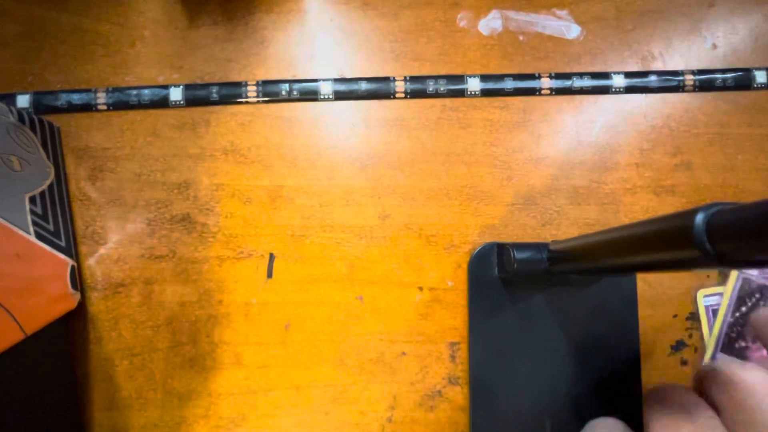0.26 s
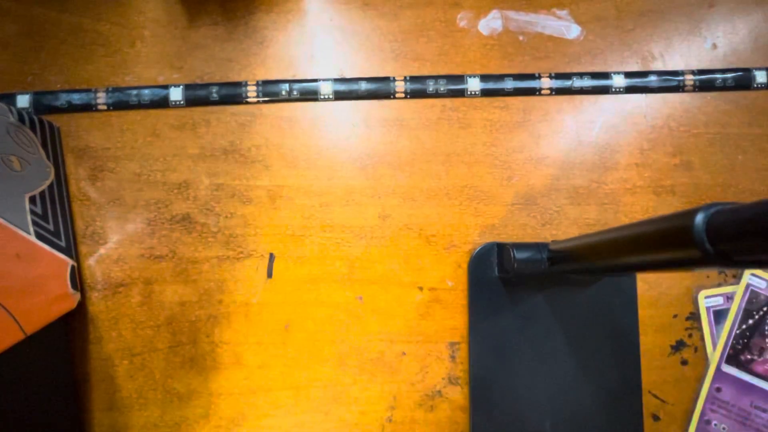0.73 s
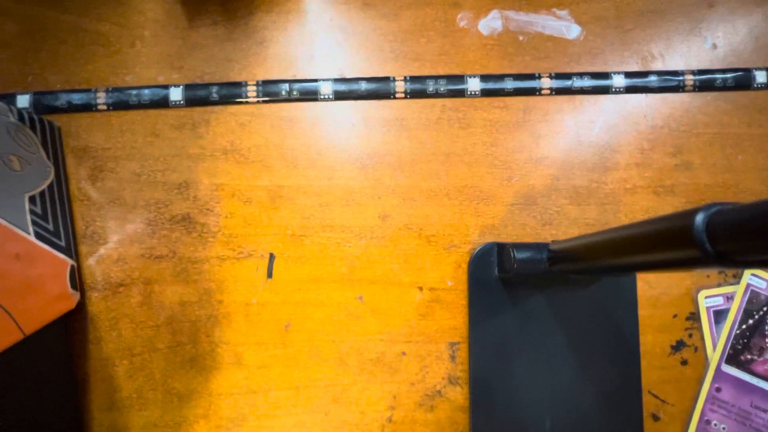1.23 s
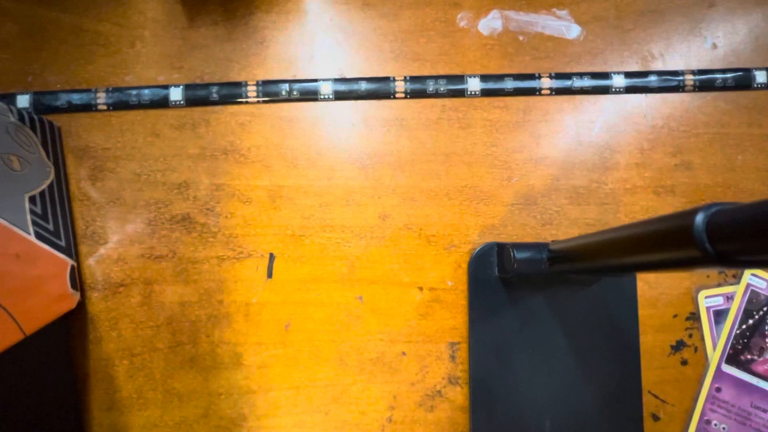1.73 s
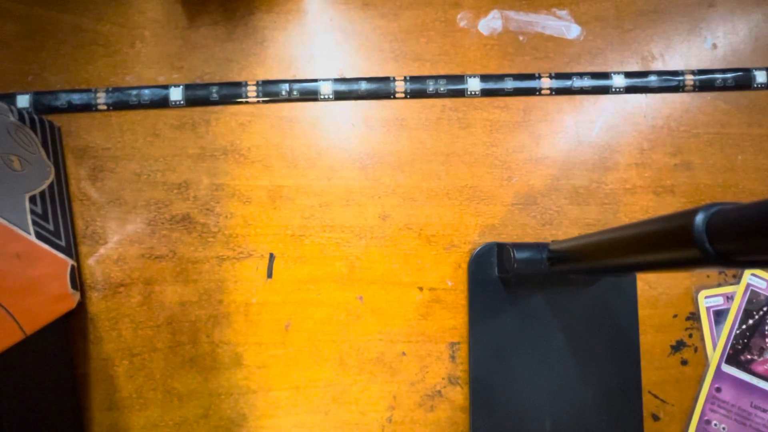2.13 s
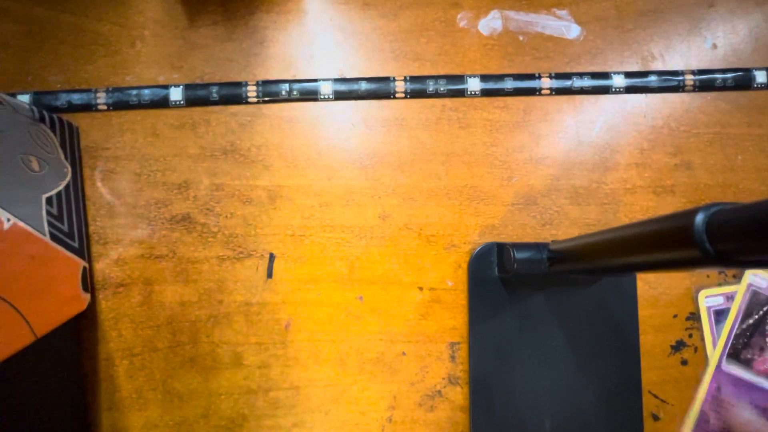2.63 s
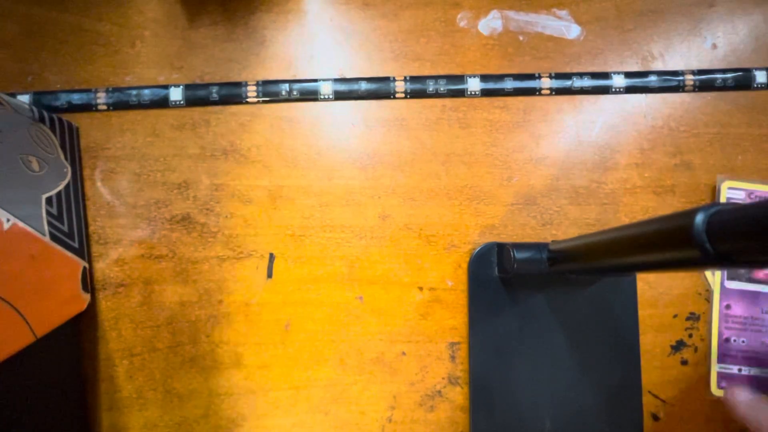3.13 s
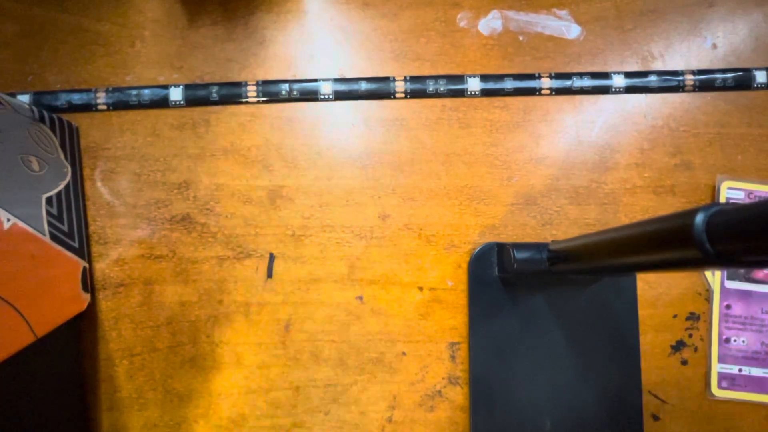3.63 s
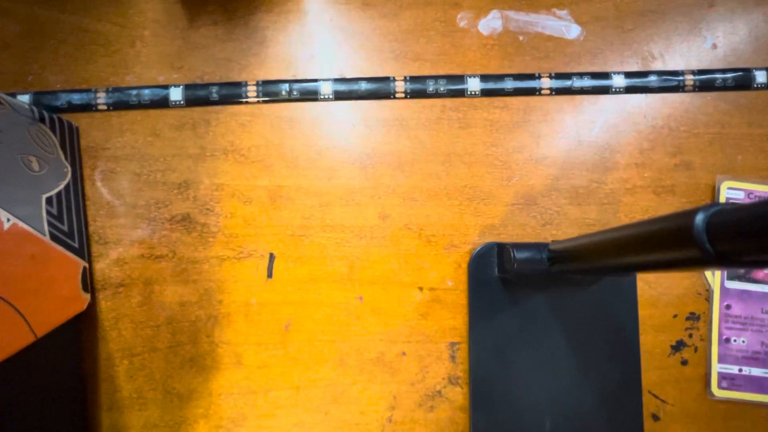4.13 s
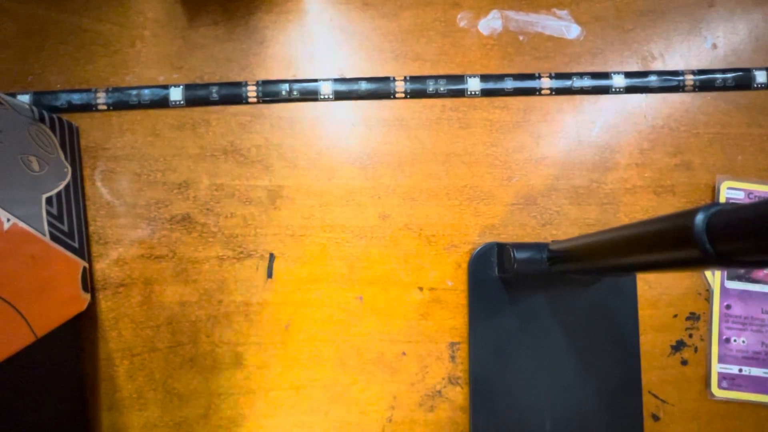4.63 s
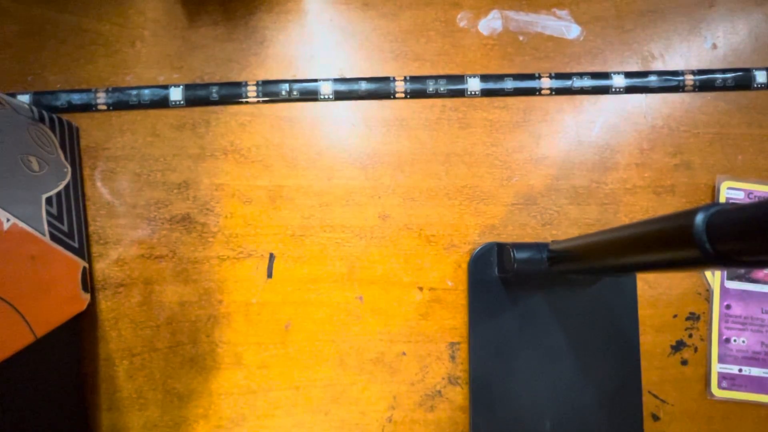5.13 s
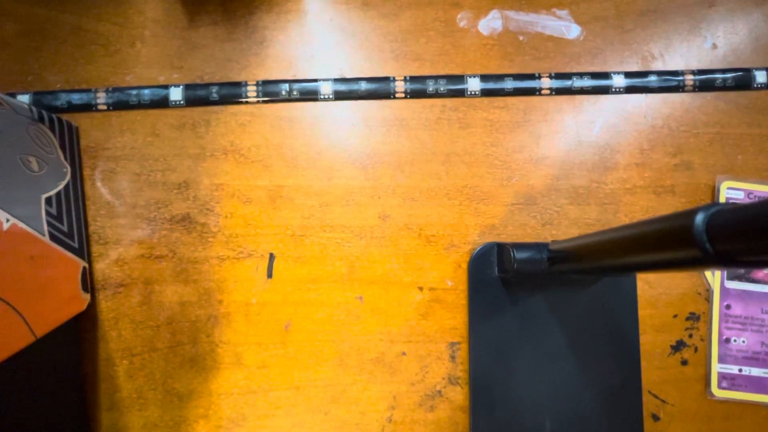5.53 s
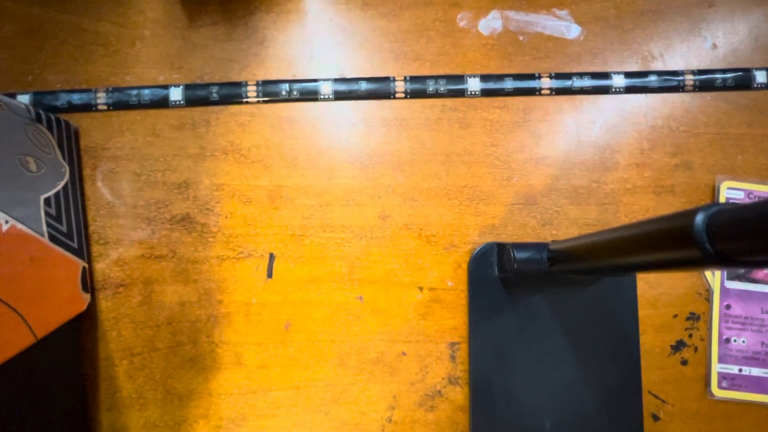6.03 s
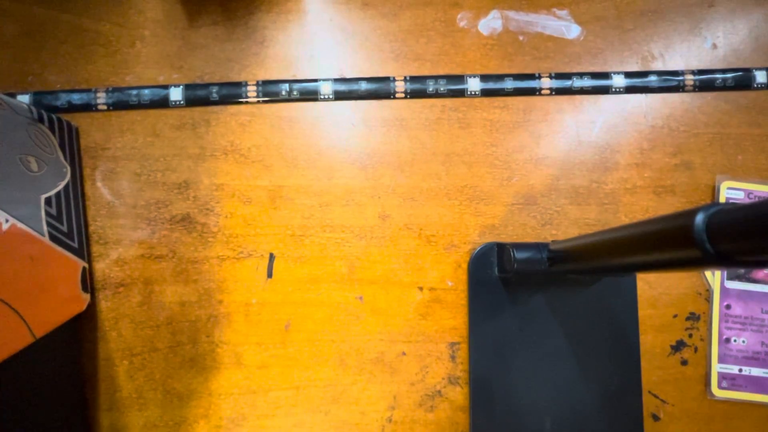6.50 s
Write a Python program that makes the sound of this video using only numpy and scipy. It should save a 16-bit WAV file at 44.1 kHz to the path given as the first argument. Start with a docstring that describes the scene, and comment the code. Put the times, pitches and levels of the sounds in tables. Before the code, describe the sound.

Quiet close handling of cards and a thin plastic sleeve on wood, with short scrapes, small clicks and a few hard clacks in a small room.

```python
"""Cards handled on a wooden desk, close to two microphones in a small room with faint 120 Hz hum.
First taps and short strokes, and a brief rub that rings a thin sleeve; then one long, sinking pull.
Later strokes alternate with ticks and bumps; something stiff clatters at 3.6, 6.0 and 6.6 s.
Blows are damped modes plus coloured noise bursts; rubbing is random slips through filters and resonances."""
import sys
import numpy as np
from scipy import signal
from scipy.fft import rfft, irfft, next_fast_len
from scipy.io import wavfile
from scipy.ndimage import uniform_filter1d

SR = 44100
rng = np.random.default_rng(int(sys.argv[2]) if len(sys.argv) > 2 else 0)


def output_pcm(signal):
    """Save a mono or channel-first signal as 16-bit PCM at the path in sys.argv[1].

    Samples are clipped to [-1, 1] before scaling.
    """
    pcm = np.clip(np.atleast_2d(signal).T, -1, 1) * 32767
    wavfile.write(sys.argv[1], SR, np.round(pcm).astype(np.int16))


N = 298116
TIME = np.arange(N) / SR

# Still air in the room. Each row: frequency in Hz, relative density in dB.
AIR_SPECTRUM = [(20, -20), (35, -6.5), (60, 6.5), (130, -6.5), (300, -16.5), (600, -20), (1200, -24.5),
                (3000, -29), (8000, -34), (12800, -38), (14300, -51.5)]
# Room decay. Each row: frequency in Hz, T60 in seconds.
ROOM_DECAY = [(100, 0.17), (400, 0.15), (1000, 0.093), (3000, 0.1), (8000, 0.088), (15000, 0.018)]
# Twist by desk and mount between microphones. Each row: frequency in Hz, extra lag in radians.
MIC_TWIST = [(60, -1), (200, 0.31), (450, 1.03), (750, 0.86), (1300, 0.5), (1800, -0.53), (3000, 0.43),
             (4000, -1.76), (5200, -2.5), (8000, -6.5)]
# Balance of the microphones. Each row: frequency in Hz, left minus right in dB.
MIC_BALANCE = [(60, 11), (300, 5.5), (700, 8.5), (1300, 3.5), (2400, 8), (5000, 12), (8000, 6),
               (11000, -1.5)]
# Likeness of the microphones. Each row: frequency in Hz, left-right likeness from 0 to 1.
MIC_LIKENESS = [(60, 1), (700, 0.98), (1500, 0.92), (2350, 0.88), (3300, 0.6), (7000, .6), (11000, 0.2)]
# Tap position, from the pile on the right towards the hands. Each row: time in seconds, right lag in ms.
TAP_PLACE = [(.25, -0.43), (.93, 0.33), (1.53, 0.39), (3.46, 0.35), (3.57, 0.35), (4.28, 0.21),
             (5.98, 0.39), (6.7, 0.37)]
# Echoes off things on the desk. Each row: delay in ms, signed share of the direct sound.
NEAR_ECHOES = [(1.05, 0.029), (2.601, -0.029), (4.3, -0.039), (6.9, 0.1)]
# Hand rumble. Each row: frequency in Hz, relative density in dB.
RUMBLE_SPECTRUM = [(20, -33.5), (32, -21), (48, -3), (70, -2.5), (120, -0.5), (200, -9), (310, -2),
                   (420, -8), (700, -19.5), (1500, -57)]
# Heel of the hand pressing and rolling. Each row: time of the peak in seconds, length in seconds, level in dB.
PRESSES = [(0.282, 0.15, -48), (0.993, 0.11, -47), (1.113, 0.24, -50.5), (1.581, 0.08, -55),
           (3.136, 0.28, -49), (3.314, 0.11, -44.5), (4.844, 0.3, -59), (5.253, 0.082, -52),
           (5.518, 0.39, -58), (5.718, 0.53, -53.5), (6.037, 0.052, -45.5), (6.342, 0.25, -50.5)]
# Soft bumps of a hand or flat card. Each row: start in seconds, level in dB, pitch in Hz.
BUMPS = [(0.113, -42.5, 120), (0.254, -33.5, 120.3), (0.945, -34, 65), (5.46, -44, 88), (6.042, -39, 94.4),
         (1.225, -49.5, 125), (3.194, -45.5, 109), (3.534, -36.5, 92), (3.748, -39.5, 72), (3.787, -49, 63),
         (3.909, -40.5, 73), (4.065, -34.5, 120), (4.768, -50, 125.7), (4.9, -52.5, 120.4),
         (5.098, -54.5, 119.6)]
# A fingertip sticks and jumps. Each row: start in seconds, level in dB.
JUDDERS = [(4.767, -46), (5.05, -52.5), (5.086, -47), (5.263, -49), (5.686, -39), (5.692, -41),
           (5.702, -41), (5.721, -37), (5.742, -42), (5.775, -43), (5.794, -53), (6.335, -42), (6.351, -52),
           (6.361, -51), (6.377, -49)]
# Desk modes rung by each jump. Each row: frequency in Hz, relative level in dB, T60 in seconds.
JUDDER_MODES = [(120.7, -9.5, 0.033), (309, 3, 0.022), (455, 0, 0.016), (653, -2, 0.023)]
# Film hiss. Each row: frequency in Hz, relative density in dB.
FILM_SPECTRUM = [(400, -4), (1200, -5.5), (2500, -7.5), (4500, 1.5), (7500, -1), (9300, -3.5), (11500, -1),
                 (13000, -9.5), (14000, -24.5), (15500, -32.5)]
# Scuffs of a stiff card's edge. Each row: start in seconds, length in seconds, starting level in dB,
# fade in dB per second, grip as a factor on mode frequency and width.
SCUFFS = [(0.117, 0.057, -72, 17.5, 1.8), (0.197, 0.035, -61.5, -90, 1.24), (0.405, 0.078, -69.5, 5, 0.76),
          (1.075, 0.078, -55.5, 20, 0.41), (1.53, 0.069, -58, 217, 0.32), (2.464, 0.36, -57.5, -28, 0.92),
          (2.735, 0.097, -54.5, 12, 1.05), (3.094, 0.088, -34.5, 175, 1.013),
          (3.306, 0.034, -43, -3.5, 0.98), (3.6, 0.072, -41.5, 127.5, 1.08),
          (3.697, 0.042, -48.5, 34, 1.137), (5.423, 0.096, -50, 7, 0.94), (5.626, 0.057, -46.5, 84, 0.92),
          (5.966, 0.022, -46.5, -1, 1), (5.995, 0.049, -45.5, 60, 0.96), (6.04, 0.14, -55.5, 108.5, 0.98),
          (6.395, 0.078, -71.5, 15, 0.95), (6.619, 0.042, -33.5, 110, 0.98)]
# Rubs on the thin sleeve. Each row: start in seconds, length in seconds, starting level in dB,
# fade in dB per second, grip as a factor on mode frequency and width.
SLEEVE_RUBS = [(1.054, 0.14, -60, 87, 0.95)]
# Bending modes of a held card. Each row: nominal frequency in Hz, nominal width in Hz, gain in dB.
CARD_MODES = [(730, 150, -1), (1420, 150, 0.5), (2320, 300, 0), (3320, 200, -6), (4450, 250, -17)]
# Modes of the sleeve. Each row: nominal frequency in Hz, nominal width in Hz, gain in dB.
SLEEVE_MODES = [(2560, 450, 0), (3720, 200, -7), (5120, 320, -2), (7350, 500, -12)]
# Resonances of the pulled card. Each row: multiple of its pitch, gain in dB.
PULL_MODES = [(.24, 3), (.57, -2.5), (1, 0.5), (1.45, -15), (2.02, -12)]
# Wood-grain rasp. Each row: frequency in Hz, relative density in dB.
RASP_SPECTRUM = [(120, -14.5), (290, -2.5), (450, 0), (660, 5), (880, 4), (1130, -2.5), (1400, -4.5),
                 (1800, -10.5), (2300, -13.5), (4200, -18), (7000, -28.5), (10000, -44), (15000, -72.5)]
# Strokes over wood and film. Each row: start in seconds, length in seconds, rise in seconds,
# fade over the stroke in dB, drag level in dB, edge sharpness as treble over drag in dB, film hiss in dB.
STROKES = [(0.1, 0.12, 0.0085, 13, -98, 3, -61), (0.188, 0.081, 0.066, 20, -64, 24.5, -50),
           (0.26, 0.073, .01, 4, -90, -14, -66), (0.369, 0.12, 0.031, -9, -105, 7, -77.5),
           (0.897, 0.035, 0.011, 0.5, -48.5, 15.5, -53.5), (1.046, 0.23, 0.011, 22, -51, 5, -64),
           (1.162, 0.17, 0.21, -5.5, -59, 7.5, -66), (1.447, 0.15, 0.032, -3, -68, -17, -99),
           (1.521, 0.44, 0.27, 3.5, -50, 4.5, -72), (2.115, 0.048, 0.041, -3.5, -64, 1, -78),
           (2.286, 0.21, 0.069, -2.5, -51.5, 8, -71.5), (2.451, 0.37, 0.0061, 0, -44, 3, -60.5),
           (2.839, 0.13, 0.011, -4.5, -58.5, 7, -71.5), (3.091, 0.086, 0.0059, 7, -39.5, 3.5, -75),
           (3.293, 0.027, 0.0062, -9, -47, 2.5, -70), (3.386, 0.14, 0.057, -4, -48.5, 11, -56.5),
           (3.579, 0.17, 0.0065, 18.5, -31.5, 0.5, -45), (3.845, 0.1, 0.065, 3.5, -42, 10.5, -51),
           (3.939, 0.12, 0.095, -4.5, -51, 11, -57.5), (4.063, 0.096, 0.0089, -1, -70, -6, -62.5),
           (4.19, 0.029, 0.017, -3, -93.5, -22, -59.5), (4.272, 0.1, 0.0061, 1.5, -62, 6.5, -58),
           (4.491, 0.16, 0.09, 6, -80, 4, -63.5), (4.749, .13, 0.014, -1, -66.5, 9.5, -71.5),
           (5.02, 0.097, 0.021, -4, -60, 1, -81.5), (5.202, .12, 0.013, 1, -62.5, 7, -78),
           (5.323, 0.29, 0.13, 13.5, -47, 7, -63), (5.62, 0.068, 0.014, 5, -43, 6.5, -63),
           (5.693, 0.057, 0.0071, 8, -51, 2, -67), (5.96, 0.1, 0.0055, 3, -43, 2.5, -65),
           (6.271, 0.098, 0.011, 3, -60.5, -0.5, -72.5), (6.387, 0.066, 0.025, 4, -47, -11, -89),
           (6.564, 0.087, 0.054, 2, -36.5, 4.5, -57.5)]
# Contact chatter of clacks. Each row: frequency in Hz, relative density in dB.
CLACK_SPECTRUM = [(300, -29.5), (900, 0), (1130, -3), (1400, 1), (1800, -3), (2300, 1), (2750, -7),
                  (3300, -3), (4200, -13.5), (6500, -13.5), (9000, -28.5), (15000, -48.5)]
# Contact chatter of ticks. Each row: frequency in Hz, relative density in dB.
TICK_SPECTRUM = [(400, -21.5), (1500, 7.5), (3500, -5), (5200, 1.5), (7500, 0.5), (9300, -6), (11500, -4.5),
                 (13500, -15.5), (16000, -15)]
# Corners catching and letting go. Each row: start in seconds, reference level in dB, pitch in Hz.
CARD_CLICKS = [(0.744, -47, 1010), (1.022, -47, 1850), (1.025, -54, 3030), (1.173, -53, 1200),
               (1.733, -48, 1500), (1.772, -33.5, 1930), (1.838, -42, 1290), (2.034, -48, 1870),
               (2.179, -54.5, 1600), (2.455, -44, 2380), (2.93, -49, 3220), (2.947, -39, 2000),
               (2.964, -37, 1800), (3.055, -47.5, 1440), (3.394, -44, 2300), (3.402, -36, 1270),
               (3.902, -27.5, 890), (3.929, -37, 2170), (3.984, -33.5, 940), (5.027, -62, 2240),
               (5.228, -57, 2120), (5.383, -45, 1150), (5.545, -40, 2190), (5.55, -35, 1130),
               (5.591, -56, 1900), (5.632, -40, 1880), (5.87, -48.5, 1477), (6.292, -37.5, 1730),
               (6.663, -26.5, 1410)]
# Damped corner modes. Each row: multiple of the pitch, relative level in dB.
CORNER_MODES = [(.52, -4), (1, 0), (1.45, -3), (2.1, -11)]
# Springy edges flicking free. Each row: start in seconds, tick reference in dB, ring level in dB, pitch in Hz.
EDGE_TICKS = [(0.109, -49, -49, 2040), (0.2471, -39, -43, 11350), (.254, -39.5, -45, 3630),
              (0.464, -65, -55, 7900), (0.476, -56.5, -55, 5080), (0.478, -69, -54, 1410),
              (0.808, -63, -67, 4900), (0.867, -66.5, -59, 11330), (1.052, -46.5, -42, 3630),
              (1.108, -65, -55, 5230), (2.41, -55, -53, 4170), (3.253, -42, -45, 3280),
              (3.337, -64, -50, 4400), (3.4, -45, -58, 4600), (3.498, -42.5, -40.5, 4600),
              (3.568, -32, -30.5, 3410), (3.571, -32.5, -36, 4630), (3.591, -32.5, -41.5, 5020),
              (3.604, -39, -43, 5630), (4.208, -63, -60, 4360), (4.284, -38.5, -49, 3500),
              (4.368, -51.5, -59, 4770), (4.581, -58, -67.5, 7600), (4.764, -67.5, -69.5, 4980)]
# Taps on the desk. Each row: start in seconds, thud in dB, knock in dB, clack in dB,
# pitch of the struck spot in Hz, ring of the card's edge in dB, pitch of the edge in Hz.
TAPS = [(.109, -47, -44, -52.5, 710, -41.5, 1510), (.254, -34, -42, -52, 390, -41.5, 1144),
        (.929, -41, -44, -41, 620, -38, 2050), (.941, -38, -36.5, -50, 530, -47, 5100),
        (0.946, -34.5, -30, -71, 398, -40, 910), (1.053, -64, -44, -84, 370, -43, 1060),
        (1.526, -56, -50, -60, 685, -61, 1250), (1.531, -44, -33.5, -64, 735, -51, 1150),
        (1.538, -40.5, -39, -66, 518, -44, 870), (2.394, -38, -38, -63, 473, -58, 990),
        (2.912, -81, -35, -51, 708, -55, 1340), (2.921, -69, -40, -53, 870, -40, 1970),
        (3.095, -32, -26, -39.5, 454, -35, 2200), (3.254, -48, -44, -39, 489, -43, 2210),
        (3.285, -46, -36, -64, 392, -60, 1362), (3.307, -55.5, -40, -50, 640, -48, 2250),
        (3.322, -61, -31, -50, 740, -31, 1310), (3.334, -46.5, -30, -39, 728, -38.5, 3400),
        (3.34, -64, -43, -38.5, 630, -41, 2300), (3.429, -39, -28, -69, 616, -58, 1360),
        (3.457, -32.5, -24.5, -42, 710, -30, 1300), (3.475, -34, -22, -41, 696, -34.5, 2330),
        (3.484, -55, -37, -67, 610, -52, 1340), (3.499, -31.5, -22.5, -25, 767, -36, 3250),
        (3.5665, -31.5, -15, -26.5, 680, -31, 3345), (3.57, -25.5, -7.5, -15.5, 714, -17.5, 1400),
        (3.59, -39, -30, -27, 840, -19.5, 2050), (3.594, -54, -14.5, -23, 876, -16.5, 1380),
        (3.604, -54, -28, -26, 904, -18, 1364), (4.282, -47.5, -39.5, -48, 700, -49, 1124),
        (5.983, -38, -16.5, -21, 735, -16, 2403), (5.9845, -33.5, -11.5, -21, 630, -15, 1360),
        (6.128, -60, -32, -48.5, 784, -42.5, 1380), (6.138, -42, -32.5, -55.5, 500, -44.5, 1153),
        (6.259, -59, -42.5, -52.5, 810, -51, 2200), (6.326, -38, -41, -76, 503, -65.5, 2300),
        (6.41, -41.5, -46, -57, 714, -54.5, 2340), (6.432, -51.5, -45, -57, 522, -54, 2410),
        (6.441, -54, -55, -64, 636, -51.5, 2320), (6.463, -48, -54, -63, 620, -61, 2480),
        (6.589, -33, -25.5, -34.5, 882, -38, 2380), (6.595, -34, -26, -54, 800, -34, 1480),
        (6.603, -32.5, -27, -40, 623, -33.5, 2320), (6.619, -25.5, -20, -30, 820, -32, 2410),
        (6.626, -22.5, -27, -33, 340, -44, 2420), (6.632, -33, -38, -41, 495, -32, 2360),
        (6.638, -54, -14, -38, 623, -27, 1420), (6.641, -43, -40, -42, 620, -48, 3120),
        (6.652, -65, -30, -31, 567, -36, 2271), (6.747, -45, -32, -55, 646, -58, 1280)]
# Slow bending of the desk top. Each row: frequency in Hz, nominal relative level in dB, T60 in seconds.
DESK_BENDING = [(71.6, -14, 0.076), (119, -4, 0.083), (177, -3.5, 0.08), (272, -5.5, .07),
                (307.9, -2, 0.079), (430, 10.5, 0.016)]
# Quick wood modes. Each row: frequency in Hz, nominal level against the struck spot in dB, T60 in seconds.
DESK_RING = [(452.5, -27.5, 0.1), (608, -20.5, 0.07), (697, -19, 0.03), (840, -25, 0.037),
             (930, -30, 0.096), (1021, -8, 0.015), (1397, -12, 0.021), (1360.5, -31, 0.051)]

BAND_EDGE_HZ = 15800
# A stroke's level rises by a power law, stops quickly and trails off as the fingers relax.
RISE_POWER, STOP_DB_PER_S, TRAIL_DB, TRAIL_DB_PER_S = 2.1, 417.5, -12.5, 92
# The hand leans harder in a louder stroke: rumble is HAND_DB (plus rest) at a drag of PUSH_DB.
PUSH_DB, HAND_DB, HAND_SLOPE_DB_PER_DB, HAND_REST_DB = -52.5, -56.5, 0.65, -74.5
CRINKLES_PER_S, CRINKLE_DB = 10, -8.5  # level against drag treble and film hiss
PULL_START_S, PULL_S, PULL_DB, PULL_SWELL_DB_PER_S = 2.47, .38, -50, 20
PULL_HZ, PULL_SAG_HZ_PER_S, PULL_WIDTH_HZ, PULL_WOBBLE_RATIO = 3480, 3100, 340, .02
CATCHES_PER_S, CATCH_DB, CATCH_SIZE_DB = 420, -44, 3.8
CATCH_T60_CYCLES, CATCH_TILT_DB_PER_OCTAVE = 30, -6
CORNER_T60_S, CORNER_TICK_DB = .007, -24
FILM_T60_S, FILM_CLACK_DB = 0.027, -17
TAP_TICK_DB = -22  # relative to the clack
SPOT_T60_S, SPOT_RISE_S, EDGE_T60_S, EDGE_RISE_S = .019, 0.0046, 0.013, 0.002


def gain_of(db):
    """Decibels to amplitude."""
    return 10 ** (np.asarray(db) / 20)


def evened(x):
    """Scales to rms 1."""
    return x / np.sqrt(np.mean(x ** 2) + 1e-20)


def peaked(x, size=88):
    """Scales so that the loudest two milliseconds of the envelope have rms 1."""
    power = abs(signal.hilbert(x)) ** 2 / 2
    return x / np.sqrt(uniform_filter1d(power, size, mode="constant").max())


def read(points, hz):
    """Reads a table on a log-frequency axis."""
    f, value = np.transpose(points)
    return np.interp(np.log(hz + 1), np.log(f + 1), value)


def add(mix, s, sound):
    """Mixes a stereo sound in at time s."""
    part = mix[:, max(round(s * SR), 0):][:, :sound.shape[1]]
    part += sound[:, :part.shape[1]]


def colour(x, spectrum, size=4096):
    """Causal minimum-phase filter with the given spectrum."""
    log_gain = np.log(gain_of(read(spectrum, abs(np.fft.fftfreq(size, 1 / SR)))))
    response = np.fft.ifft(np.exp(np.conj(signal.hilbert(log_gain)))).real
    return signal.fftconvolve(x, response[:size // 2])[:len(x)]


def wander(cutoff_hz):
    """Smooth random curve of rms 1."""
    hz = np.fft.rfftfreq(N, 1 / SR)
    return evened(irfft(rfft(rng.standard_normal(N)) / (1 + (hz / cutoff_hz) ** 4), N))


def microphones(x, lag_ms=0.412, size=96):
    """Stereo pair: right is delayed, rebalanced by frequency and partly scattered over two milliseconds."""
    length = next_fast_len(len(x) + 16 * size, True)
    hz = np.fft.rfftfreq(length, 1 / SR)
    same = np.clip(read(MIC_LIKENESS, hz), 0, 1)
    scatter = rfft(irfft(np.exp(2j * np.pi * rng.random(size // 2 + 1))), length)
    lag = np.exp(-1j * (2 * np.pi * hz * lag_ms / 1000 + read(MIC_TWIST, hz)))
    right_gain = gain_of(-read(MIC_BALANCE, hz))
    right = right_gain * lag * (same + np.sqrt(1 - same ** 2) * scatter)
    pair = np.array([np.ones(len(hz)), right])
    power_norm = np.sqrt(2 / (1 + right_gain ** 2))
    return irfft(rfft(x, length) * pair * power_norm, length)[:, :len(x)]


def dying(t, hz, t60_s, rise_s):
    """One mode that swells, then dies away."""
    return np.sin(2 * np.pi * hz * t) * gain_of(-60 * t / t60_s) * (1 - np.exp(-t / rise_s))


def ring(modes, t, detune, spread_db, favour_db=0):
    """Dying modes, randomly detuned and weighted at each strike."""
    hz, db, t60_s = np.transpose(modes)
    shift, weight = rng.standard_normal((2, len(modes)))
    height = rng.choice([-1, 1], len(modes)) * gain_of(db + favour_db + spread_db * weight)
    decay = gain_of(-60 * t[:, None] / t60_s)
    return (decay * np.sin(2 * np.pi * hz * (1 + detune * shift) * t[:, None])) @ height


def snap(spectrum, t, t60_s, rise_s):
    """Contact chatter: a brief noise burst coloured by the struck thing."""
    contact = rng.standard_normal(len(t)) * gain_of(-60 * t / t60_s) * (1 - np.exp(-t / rise_s))
    return peaked(colour(contact, spectrum))


def friction(slips_per_s, size_db, smooth, judder_db, judder_hz):
    """Random slips of uneven size plus noise, clumped by the unsteady push of the fingers."""
    sizes = gain_of(size_db * np.minimum(rng.exponential(1, N), 4)) * rng.choice([-1, 1], N)
    slips = evened(sizes * (rng.random(N) < slips_per_s / SR))
    return evened((slips + smooth * rng.standard_normal(N)) * gain_of(judder_db * wander(judder_hz)))


def resonate(x, hz, width_hz):
    """A steep resonance that follows the curve hz."""
    turn = np.exp(2j * np.pi * np.cumsum(hz) / SR)
    r = np.exp(-np.pi * width_hz / SR)
    return 2 * (turn * signal.lfilter([(1 - r) ** 2], [1, -2 * r, r * r], x / turn)).real


def background():
    """Still room air as partly shared noise, and a faint mains hum with wandering phase."""
    left, right, shared = (evened(colour(rng.standard_normal(N), AIR_SPECTRUM)) for _ in range(3))
    air = np.array([left, right]) + 2.14 * shared
    hum = np.sqrt(2) * np.sin(2 * np.pi * 120 * TIME + 0.24 * wander(2))
    return gain_of(-77.0) * air + gain_of(-75.5) * microphones(hum)


def room(x, size=256, count=20000):
    """Dense reflections from nearby walls, each band dying at its own speed; fed by the left channel."""
    echoes = rng.standard_normal((2, count)) * (rng.random((2, count)) < .1)
    hz, t, z = signal.stft(echoes, SR, nperseg=size)
    decay = gain_of(-60 * t / read(ROOM_DECAY, hz)[:, None])
    tail = signal.istft(z * decay, SR, nperseg=size)[1][:, :count]
    tail = tail * np.clip((TIME[:count] - .003) / 0.0046, 0, 1)
    tail = tail / np.linalg.norm(tail, axis=1)[:, None]
    return signal.fftconvolve(x[:1], tail, axes=1)[:, :N] * gain_of([[0], [-3]])


def hollow(x):
    """Echoes from close by comb the rubbing into hollow bands."""
    length = next_fast_len(N + SR, True)
    hz = np.fft.rfftfreq(length, 1 / SR)
    comb = 1 + sum(share * np.exp(-2j * np.pi * hz * ms / 1000) for ms, share in NEAR_ECHOES)
    return irfft(rfft(x, length) * comb, length)[:, :N]


def hands(push):
    """Soft skin rumbles on the desk top, with every stroke and when the hand presses down."""
    level = gain_of(HAND_DB) * (push / gain_of(PUSH_DB)) ** HAND_SLOPE_DB_PER_DB + gain_of(HAND_REST_DB)
    for s, length_s, db in PRESSES:
        press = np.cos(np.pi * np.clip((TIME - s) / length_s, -.5, .5)) ** 2
        level = np.hypot(level, gain_of(db) * press)
    slips = friction(slips_per_s=220, size_db=2.5, smooth=0.89, judder_db=2.0, judder_hz=60)
    return microphones(level * evened(colour(slips, RUMBLE_SPECTRUM)))


def bumps(size=8192):
    """A soft push sets the desk top swinging in one damped mode."""
    out, t = np.zeros((2, N)), np.arange(size) / SR
    for s, db, hz in BUMPS:
        swing = dying(t, hz, t60_s=0.17, rise_s=0.0006)
        add(out, s, microphones(gain_of(db) * peaked(swing)))
    return out


def judders(size=4096):
    """As a stroke slows, each jump of the fingertip gives the desk a dull little knock."""
    out, t = np.zeros((2, N)), np.arange(size) / SR
    for s, db in JUDDERS:
        jump = ring(JUDDER_MODES, t, detune=0.065, spread_db=0.5) * (1 - np.exp(-t / 0.0033))
        add(out, s, microphones(gain_of(db) * peaked(jump)))
    return out


def crinkles(treble, film):
    """The moving card snags at random, at levels that follow the rubbing."""
    snags = rng.choice([-1, 1], N) * (rng.random(N) < CRINKLES_PER_S / SR)
    dull, bright = peaked(colour(snags, CLACK_SPECTRUM)), peaked(colour(snags, TICK_SPECTRUM))
    return microphones(gain_of(CRINKLE_DB) * (treble * dull + film * bright))


def glide(film):
    """Thin film hisses finely as the card moves along it."""
    slips = friction(slips_per_s=2100, size_db=1.0, smooth=0.44, judder_db=2.0, judder_hz=70)
    return microphones(film * evened(colour(slips, FILM_SPECTRUM)), lag_ms=0.4)


def scuffs(rows, modes):
    """Slips of an edge drive the sheet's own modes, which shift as the fingers bend it."""
    out, bend = np.zeros((2, N)), 1 + 0.024 * wander(14)
    slips = friction(slips_per_s=900, size_db=3, smooth=.65, judder_db=1.5, judder_hz=80)
    for s, length_s, db, fade_db_per_s, grip in rows:
        during = (TIME >= s) & (TIME < s + length_s)
        sheet = evened(sum(
            gain_of(mode_db) * resonate(slips[during], hz * grip * bend[during], 0.99 * width_hz * grip)
            for hz, width_hz, mode_db in modes))
        level = gain_of(db - fade_db_per_s * (TIME[during] - s))
        add(out, s, microphones(sheet * level * signal.windows.tukey(len(sheet), .15), lag_ms=0.4))
    return out


def catches(count=24, size=1024):
    """Tiny catches of the pulled edge on the grain, ringing briefly at one of several pitches."""
    length, t = round(PULL_S * SR), np.arange(size) / SR
    grit, out = np.zeros(length), np.zeros((2, N))
    for hz in np.geomspace(550, 6000, count):
        sizes = gain_of(CATCH_SIZE_DB * np.minimum(rng.exponential(1, length), 3))
        kicks = sizes * (rng.random(length) < CATCHES_PER_S / count / SR)
        grain = evened(dying(t, hz, CATCH_T60_CYCLES / hz, 1 / hz))
        grain = grain * gain_of(CATCH_TILT_DB_PER_OCTAVE * np.log2(hz / 1000))
        grit += signal.fftconvolve(kicks, grain)[:length]
    add(out, PULL_START_S, microphones(gain_of(CATCH_DB) * evened(grit)))
    return out


def long_pull():
    """Slips drive the card's resonances, which sink together as its free length grows."""
    t = np.arange(0, PULL_S, 1 / SR)
    slips = friction(slips_per_s=600, size_db=3.5, smooth=.3, judder_db=2.2, judder_hz=70)[:len(t)]
    hz = (PULL_HZ - PULL_SAG_HZ_PER_S * t) * (1 + PULL_WOBBLE_RATIO * wander(7.4)[:len(t)])
    song = evened(sum(gain_of(db) * resonate(slips, ratio * hz, PULL_WIDTH_HZ) for ratio, db in PULL_MODES))
    level = gain_of(PULL_DB + PULL_SWELL_DB_PER_S * t) * signal.windows.tukey(len(t), .2)
    out = np.zeros((2, N))
    add(out, PULL_START_S, microphones(song * level, lag_ms=0.36))
    return out


def stroke_levels():
    """Amplitudes of drag, its treble and film hiss: each stroke rises, fades by its own slope and stops."""
    power = np.zeros((3, N))
    for s, length_s, rise_s, fade_db, drag_db, sharp_db, film_db in STROKES:
        t = TIME[TIME >= s][:SR] - s
        after = np.maximum(t - length_s, 0)
        progress = np.clip((t - rise_s) / max(length_s - rise_s, .001), 0, 1)
        held = np.clip(t / rise_s, 0, 1) ** RISE_POWER * gain_of(-fade_db * progress)
        release = np.maximum(gain_of(-STOP_DB_PER_S * after), gain_of(TRAIL_DB - TRAIL_DB_PER_S * after))
        levels = gain_of([[drag_db], [drag_db + sharp_db], [film_db]])
        add(power, s, (levels * held * release) ** 2)
    return np.sqrt(power)


def drag(body, treble):
    """Slips over the wood grain sound through the desk; a sharper edge brings more treble."""
    slips = friction(slips_per_s=1400, size_db=3.0, smooth=.6, judder_db=1.2, judder_hz=60)
    rasp = evened(colour(slips, RASP_SPECTRUM))
    dull = signal.sosfiltfilt(signal.butter(2, 1600, fs=SR, output="sos"), rasp)
    return microphones(body * dull + treble * (rasp - dull))


def flick(clack_db, tick_db, ring_db, rung, t):
    """An edge catches, springs free and rings for a moment."""
    clack = gain_of(clack_db - 16.5) * snap(CLACK_SPECTRUM, t, t60_s=0.0095, rise_s=0.00013)
    tick = gain_of(tick_db - 0.5) * snap(TICK_SPECTRUM, t, t60_s=0.022, rise_s=0.00015)
    return microphones(clack + tick + gain_of(ring_db) * peaked(rung), lag_ms=0.34)


def flicks(size=2048):
    """Card corners click dully in several damped modes; springy edges tick brightly and ring on."""
    out, t = np.zeros((2, N)), np.arange(size) / SR
    for s, db, hz in CARD_CLICKS:
        corner = sum(
            rng.choice([-1, 1]) * gain_of(mode_db) * dying(t, ratio * hz, CORNER_T60_S, rise_s=0.00029)
            for ratio, mode_db in CORNER_MODES)
        add(out, s, flick(db, db + CORNER_TICK_DB, db - 4.0, corner, t))
    for s, tick_db, ring_db, hz in EDGE_TICKS:
        edge = dying(t, hz, FILM_T60_S, rise_s=0.00016)
        add(out, s, flick(tick_db + FILM_CLACK_DB, tick_db, ring_db, edge, t))
    return out


def taps(size=8192):
    """Each tap bends the desk, rings the wood around the spot and snaps the card's edge at its own pitch."""
    out, t = np.zeros((2, N)), np.arange(size) / SR
    for s, thud_db, knock_db, clack_db, spot_hz, edge_db, edge_hz in TAPS:
        thud = peaked(ring(DESK_BENDING, t, detune=0.022, spread_db=2.5) * (1 - np.exp(-t / 0.005)))
        # modes below the spot's pitch are barely driven, and a soft blow misses the high ones
        octaves = np.log2(np.transpose(DESK_RING)[0] / spot_hz)
        hardness_db = min(clack_db - knock_db + 14.0, 3)
        favour_db = 14 * np.minimum(octaves, 0) + 0.21 * np.maximum(octaves, 0) * hardness_db
        wood = ring(DESK_RING, t, detune=0.0025, spread_db=4.5, favour_db=favour_db)
        wood = wood * (1 - np.exp(-t / SPOT_RISE_S))
        knock = peaked(dying(t, spot_hz, SPOT_T60_S, SPOT_RISE_S) + wood)
        edge = peaked(dying(t, edge_hz, EDGE_T60_S, EDGE_RISE_S))
        chatter_s = 0.01 + 0.024 * np.sqrt(gain_of(knock_db))  # a harder blow chatters longer
        clack = snap(CLACK_SPECTRUM, t, t60_s=chatter_s, rise_s=0.00062)
        clack = clack + gain_of(TAP_TICK_DB) * snap(TICK_SPECTRUM, t, t60_s=chatter_s, rise_s=0.00043)
        blow = gain_of(thud_db) * thud + gain_of(knock_db) * knock
        blow = blow + gain_of(clack_db) * clack + gain_of(edge_db) * edge
        add(out, s, microphones(blow, np.interp(s, *np.transpose(TAP_PLACE))))
    return out


def scene():
    """Blows and rubbing on the desk, with the room around them."""
    body, treble, film = stroke_levels()
    blows = taps() + flicks() + bumps() + judders()
    sheets = scuffs(SCUFFS, CARD_MODES) + scuffs(SLEEVE_RUBS, SLEEVE_MODES)
    pull = long_pull() + catches()
    strokes = drag(body, treble) + glide(film) + crinkles(treble, film)
    rubbing = hollow(strokes + sheets + pull) + hands(body)
    return blows + rubbing + room(gain_of(-20) * blows + gain_of(-17.5) * rubbing) + background()


def record(dry):
    """The microphones lose the deepest bass and round off the loudest peaks; then the band limit."""
    dry = signal.sosfilt(signal.butter(2, 36, "highpass", fs=SR, output="sos"), dry)
    band = signal.firwin(511, BAND_EDGE_HZ, window=("kaiser", 9), fs=SR)
    return signal.oaconvolve(np.tanh(dry), band[None], "same")


dry = scene()
out = record(dry)
output_pcm(out)
```